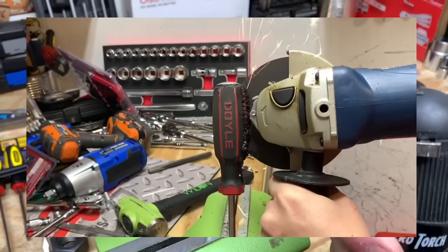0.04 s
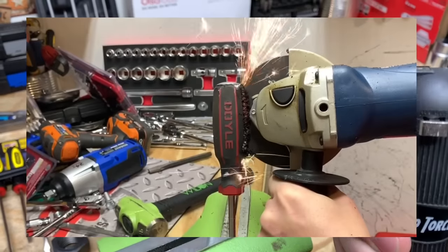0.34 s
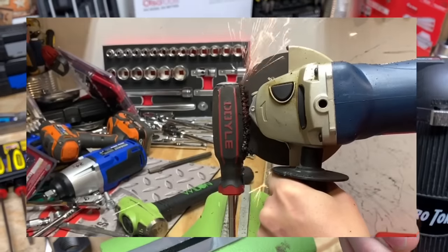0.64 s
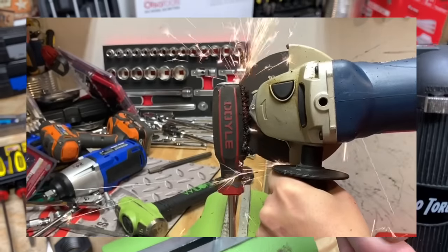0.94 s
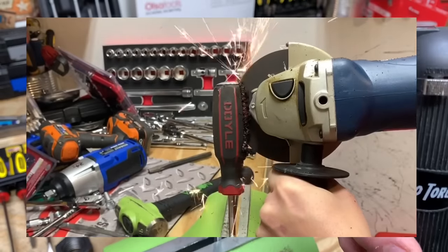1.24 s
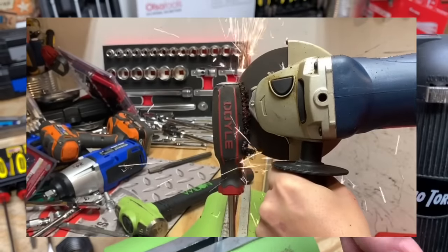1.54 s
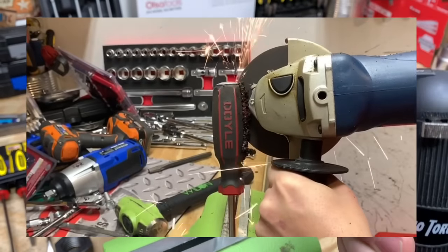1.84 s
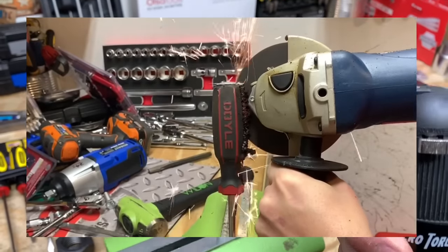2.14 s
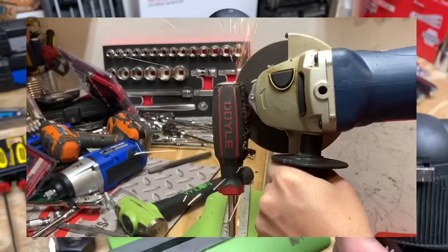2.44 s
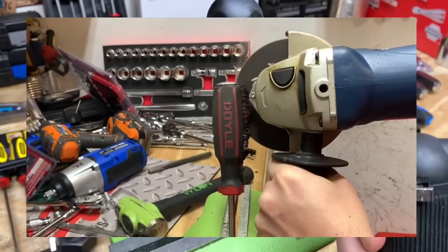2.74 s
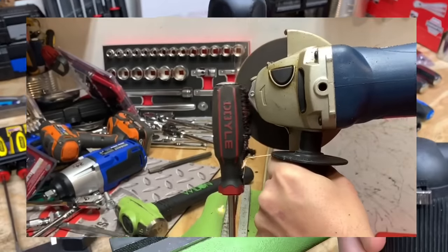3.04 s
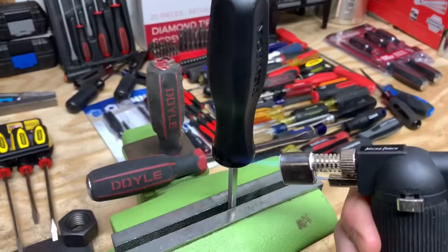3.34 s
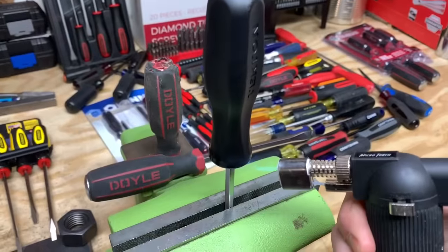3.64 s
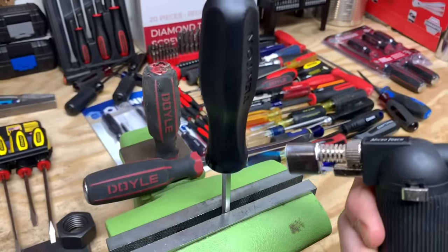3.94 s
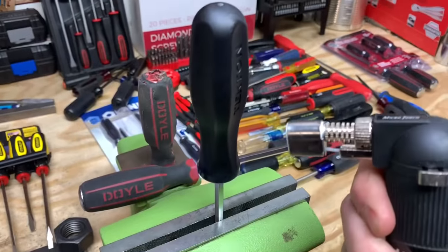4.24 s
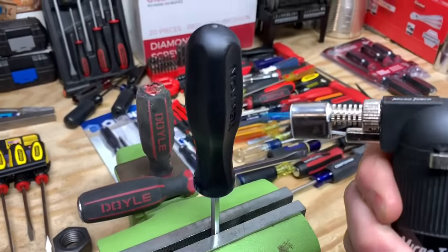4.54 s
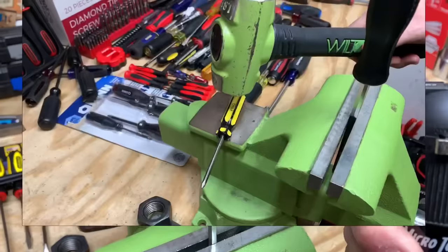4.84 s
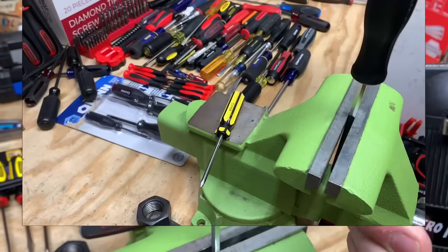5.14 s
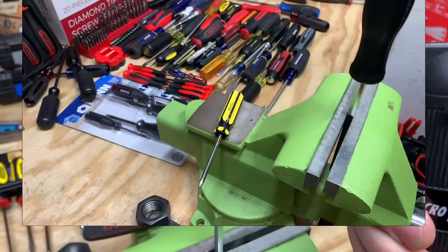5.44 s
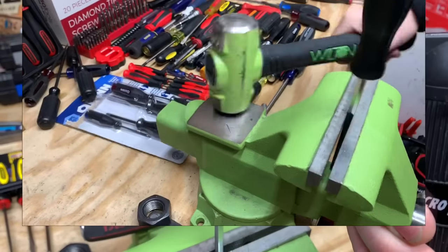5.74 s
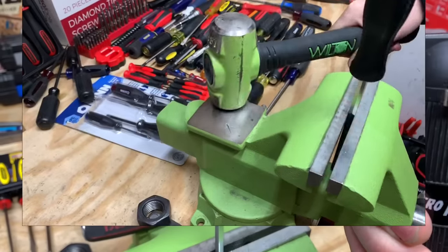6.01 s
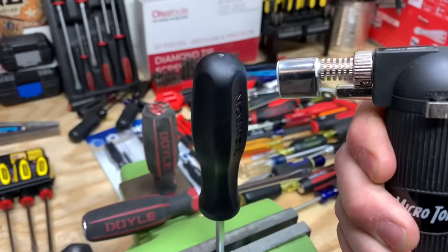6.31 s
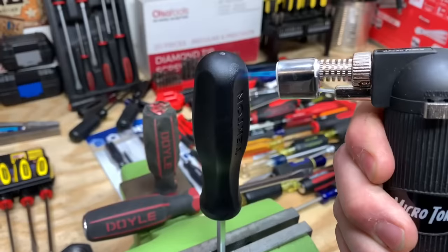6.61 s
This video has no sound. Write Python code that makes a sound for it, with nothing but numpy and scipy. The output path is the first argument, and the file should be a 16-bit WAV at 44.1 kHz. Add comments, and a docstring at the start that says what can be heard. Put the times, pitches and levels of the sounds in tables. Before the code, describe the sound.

An angle grinder bites into a plastic screwdriver handle, rasping and hissing with a wavering gear whine that sinks in pitch as the cut deepens. After about three seconds it fades quickly, leaving the quiet, steady hiss and low rumble of a small gas torch. Near the end a hammer crushes a small screwdriver on a steel vice: a sharp crack, crunching plastic and a brief ringing rattle. The sound is close and dry, at a workbench.

```python
"""Angle grinder, gas torch and hammer.

An angle grinder bites into a plastic screwdriver handle held in a vice and slows as the cut deepens:
its rim rasps, its grit hisses, its gears whine. It fades out over the steady hiss of a small gas torch.
Then a hammer crushes a small screwdriver on the anvil of the vice: a crack, crunching plastic,
and steel that rattles and rings."""
import sys
import numpy as np
from scipy import signal
from scipy.fft import rfft, irfft, next_fast_len
from scipy.io import wavfile
from scipy.ndimage import uniform_filter1d, map_coordinates

SR = 44100
rng = np.random.default_rng(int(sys.argv[2]) if len(sys.argv) > 2 else 0)


def store_pcm(level_fs):
    """Save levels as 16-bit WAV."""
    pcm = np.round(np.clip(level_fs, -1, 1) * 32767).astype(np.int16)
    wavfile.write(sys.argv[1], SR, np.atleast_2d(pcm).T)


N = 294147
T = np.arange(N) / SR
BINS_HZ = np.fft.rfftfreq(N, 1 / SR)


def amp(db):
    """Decibels to gain."""
    return 10 ** (np.asarray(db) / 20)


def unit(x):
    """Scales to rms 1."""
    return x / np.sqrt(np.mean(abs(x) ** 2) + 1e-20)


def levelled(x):
    """Holds the running rms at 1."""
    return x / np.sqrt(abs(uniform_filter1d(x ** 2, size=5000)) + 1e-12)


def curve(rows):
    """Rows of (seconds, value) interpolated over T."""
    return np.interp(T, *np.transpose(rows))


def spectrum(rows):
    """Rows of (Hz, value) interpolated over BINS_HZ on a log axis."""
    hz, value = np.transpose(rows)
    return np.interp(np.log(BINS_HZ + 1), np.log(hz + 1), value)


def shaped(x, gain):
    """Filters x by a gain given at BINS_HZ."""
    size = next_fast_len(N)
    return irfft(rfft(x, size) * np.interp(np.fft.rfftfreq(size, 1 / SR), BINS_HZ, gain), size)[:N]


def noise(gain):
    """Filtered noise of rms 1."""
    return unit(shaped(rng.standard_normal(N), gain))


def peak(hz, width_hz):
    """Gain of a steep-sided resonance."""
    return 1 / (1 + 0.4 * ((BINS_HZ ** 2 - hz ** 2) / (width_hz * (BINS_HZ + 1))) ** 2)


def drift(per_s):
    """Random wander of rms 1."""
    knots = rng.standard_normal(4000)
    return unit(np.interp(T * per_s, np.arange(len(knots)), knots))


def bump(peak_s, length_s):
    """Smooth rise and fall."""
    return np.cos(np.pi * np.clip((T - peak_s) / length_s, -.5, .5)) ** 2


def swell(t, rise_s, t60_s, hold_until_s=0):
    """Linear rise, optional hold, exponential decay."""
    return np.clip(t / rise_s, 0, 1) * amp(-60 * np.maximum(t - max(rise_s, hold_until_s), 0) / t60_s)


def delayed(x, delay_s):
    """Time-varying delay."""
    return map_coordinates(x, [(T - delay_s) * SR], order=3)


def add(mix, start_s, sound):
    """Mixes a sound in at start_s."""
    part = mix[round(start_s * SR):][:len(sound)]
    part += sound[:len(part)]


# Flame spectrum. Each row: frequency in Hz, relative level in dB.
FLAME_SPECTRUM = [(15, -25), (25, -6), (50, -9), (82, -14), (161, -6.5), (216, -8.5), (280, -18.5),
                  (650, -19), (1200, -21.5), (1950, -31), (3200, -26), (4500, -17), (5500, -26.5),
                  (7500, -33.5), (11200, -32.5), (12200, -40), (15800, -33)]
# Flame and nozzle resonances. Each row: frequency in Hz, width in Hz, dB aimed low, dB aimed high.
JET_MODES = [(47.4, 16, -62, -57), (4533, 330, -54.3, -52.5), (5700, 1200, -65.5, -64),
             (7470, 550, -75, -66), (9860, 500, -79, -72.5), (14700, 830, -70, -74)]
# Echo off the bench. Each row: time in seconds, extra path in metres.
BENCH_PATH = [(3.3, .173), (3.63, .158), (3.8, .168), (4.0, .197), (4.22, .236), (4.45, .262), (4.75, .283),
              (5.5, .313)]


def torch(flame_db=-53, sputter_db=-69, tilt_start_s=3.75, tilt_length_s=0.35, beam_hz=14000):
    """The flame rumbles and the nozzle hisses; raised, the torch sputters and its bench echo sweeps."""
    aim = np.clip((T - tilt_start_s) / tilt_length_s, 0, 1)
    gas = amp(flame_db) * noise(amp(spectrum(FLAME_SPECTRUM)))
    for hz, width_hz, low_db, high_db in JET_MODES:
        gas += amp(low_db + aim * (high_db - low_db)) * noise(peak(hz, width_hz))
    gas *= amp(.5 * drift(25))  # flutter
    gas += aim * amp(sputter_db + 5 * np.minimum(drift(70), 2)) * noise(peak(1520, 1040))
    path_m = curve(BENCH_PATH)
    treble_beam = BINS_HZ / np.hypot(BINS_HZ, beam_hz)
    echo = shaped(delayed(gas, path_m / 343), treble_beam)  # sound travels 343 m/s
    return gas + .55 * (.18 / path_m) ** .6 * echo


def burst(db, hz, octaves, t60_s, rise_s, size=8192):
    """A short burst of noise in one band."""
    t, f = T[:size], np.fft.rfftfreq(size, 1 / SR) + 1
    band = np.exp(-.5 * (np.log2(f / hz) / octaves) ** 2) / np.sqrt(1 + f / hz)
    envelope = amp(db - 60 * t / t60_s) * (1 - np.exp(-t / rise_s))
    sound = envelope * irfft(band * np.exp(2j * np.pi * rng.random(len(f))))
    return sound * np.linalg.norm(envelope) / np.linalg.norm(sound)


# The handle gives way. Each row: start in seconds, snap in dB, snap in Hz, knock in dB, knock in Hz.
FRACTURES = [(5.6254, -30, 9000, -26, 1460), (5.63, -20.5, 3460, -29.5, 500),
             (5.68, -26.5, 7000, -21, 2040), (5.793, -33, 8500, -46, 700), (5.825, -41, 4500, -25.5, 360),
             (5.859, -26.5, 8000, -26, 603), (5.9258, -30.5, 6000, -39, 700),
             (5.994, -26.5, 5640, -44, 1500), (6.044, -22.5, 2020, -26.5, 597),
             (6.108, -35, 4000, -28, 740), (6.1197, -24.5, 8300, -49, 900), (6.18, -27, 2960, -30, 1400),
             (6.27, -30, 6240, -60, 1000)]


def hammer_cracks(strike_s=5.6242):
    """The hammer lands with a tick; each fracture is a bright snap and a duller knock on the anvil."""
    out = np.zeros(N)
    add(out, strike_s, burst(db=-12.5, hz=9900, octaves=.5, t60_s=.007, rise_s=0.00014))
    for start_s, snap_db, snap_hz, knock_db, knock_hz in FRACTURES:
        add(out, start_s, burst(snap_db, snap_hz, octaves=0.67, t60_s=0.043, rise_s=0.0008))
        ring_s = 0.078 * (1000 / knock_hz) ** 0.39  # lower knocks ring longer
        add(out, start_s, burst(knock_db, knock_hz, octaves=0.7, t60_s=ring_s, rise_s=0.0019))
    return out


# Spectra of crushing and of sliding on steel. Each row: frequency in Hz, relative level in dB.
CRUNCH_SPECTRUM = [(30, -25), (60, 6), (200, 0.5), (300, 4.5), (420, 0), (680, 3.5), (1050, -5.5),
                   (1600, 0), (3000, -7), (6500, -17.5), (9000, -19), (15500, -42)]
SLIDE_SPECTRUM = [(100, -19), (300, -19), (700, 6.5), (1500, -2), (3500, 4.5), (6000, -8), (8000, -12),
                  (11000, -24), (15500, -15)]
# The hammer bears down. Each row: start in seconds, length in seconds, level in dB, brightness 0-1.
HAMMER_SQUEEZES = [(5.621, 0.097, -34.5, 0.2), (5.723, 0.12, -33.5, .1), (5.852, 0.053, -41.5, 0),
                   (5.904, 0.075, -45.5, .1), (5.972, 0.068, -41.5, 0.5), (6.051, 0.053, -32, 0.43),
                   (6.14, 0.048, -33.5, .75), (6.206, 0.03, -46, 1)]


def plastic_crunch(grains_per_s=4000, spread_db=0.5, lumpy_db=1.2):
    """Tiny fractures crowd under each squeeze; they brighten when the head slides on steel."""
    sizes = amp(spread_db * np.minimum(rng.exponential(1, N), 4)) * rng.choice([-1, 1], N)
    grains = sizes * (rng.random(N) < grains_per_s / SR) * amp(lumpy_db * drift(170))
    crunch = unit(shaped(grains, amp(spectrum(CRUNCH_SPECTRUM))))
    slide = unit(shaped(grains, amp(spectrum(SLIDE_SPECTRUM))))
    out = np.zeros(N)
    for start_s, length_s, db, bright in HAMMER_SQUEEZES:
        envelope = amp(db) * swell(T - start_s, rise_s=0.015, t60_s=.16, hold_until_s=length_s)
        out += envelope * ((1 - bright) * crunch + bright * slide)
    return out


# Modes of the steel. Each row: frequency in Hz, relative level in dB, t60 in seconds.
STEEL_MODES = [(2599, 1, .24), (3020, -10, .12), (3582, -8, .2), (4001, -4.5, .27), (4163, -6, .22),
               (4392, -9, .2), (5008, -1, .4), (5620, 0, .22), (6002, -12, .25), (7160, -9, .15),
               (7293, -8, .25), (7452, -7, .35), (7928, -2, .16), (8900, -13, .15), (9146, -11, .19),
               (9680, -11, .2), (9815, -13, .2), (10470, -16, .2), (11200, -16, .15), (13300, -17, .2),
               (14290, -19, .2)]
# Bouts of rattling. Each row: start in seconds, level in dB, rise in seconds, tilt in dB per octave.
RATTLE_BOUTS = [(5.995, -33, 0.034, 2), (6.065, -33.3, 0.021, -2), (6.121, -33.5, .0045, 5.5)]
# Thin pings. Each row: start in seconds, level in dB, frequency in Hz, rise and t60 in seconds.
SHAFT_PINGS = [(5.68, -37, 14280, .06, .2), (5.68, -40.5, 13160, .07, .35), (5.735, -35, 9674, .05, .55),
               (6.185, -39.5, 11690, .03, .13)]


def steel_rattle(start_s=5.6, pivot_hz=5500, shimmer_db=3.0, jolt_rad=0.2, jolts_per_s=120):
    """Rattling steel rings in its modes, jolted in level and phase; the loosened shaft pings."""
    out, t = np.zeros(N), T[T > start_s]
    partials = []
    for hz, mode_db, t60_s in STEEL_MODES:
        bouts = sum(amp(db + tilt * np.log2(hz / pivot_hz)) * swell(t - at_s, rise_s, t60_s)
                    for at_s, db, rise_s, tilt in RATTLE_BOUTS)
        partials.append((hz, amp(mode_db) * bouts))
    for at_s, db, hz, rise_s, t60_s in SHAFT_PINGS:
        partials.append((hz, amp(db) * swell(t - at_s, rise_s, t60_s)))
    for hz, envelope in partials:
        shimmer, jolt = (np.interp((t - start_s) * jolts_per_s, np.arange(200), knots)
                         for knots in rng.standard_normal((2, 200)))
        phase = 2 * np.pi * (hz * t + rng.random()) + jolt_rad * jolt
        out[-len(t):] += envelope * amp(shimmer_db * shimmer) * np.sin(phase)
    return out


def workshop(x, wet_db=-13, t60_s=0.099, size=12000):
    """Adds a short tail from the cluttered bench and walls."""
    t = T[:size]
    tail = rng.standard_normal(size) * (rng.random(size) < .05) * (t > .003) * amp(-60 * t / t60_s)
    return x + amp(wet_db) * signal.fftconvolve(x, tail / np.linalg.norm(tail))[:N]


# Rim friction. Each row: frequency in Hz, share 0-1 that repeats with each turn.
REPEAT_SHARE = [(200, 0.96), (700, 0.76), (1500, 0.66), (3000, 0.65), (6000, 0.5), (10000, 0.33)]


def rim_friction(turns, wears, size=4096, harmonics=130):
    """Rim bumps pass once a turn, over noise; some come and go with wear. One signal per wear value."""
    place = (turns * size).astype(int) % size
    phases = 2 * np.pi * rng.random((4, harmonics))
    lasting, *passing = [unit(irfft(np.r_[0, 0, np.exp(1j * p)], size))[place] for p in phases]
    worn = sum(bumps * drift(4.047) for bumps in passing)
    share = np.clip(spectrum(REPEAT_SHARE), 0, 1)
    loose = shaped(rng.standard_normal(N), np.sqrt(1 - share))
    return [shaped(0.61 * unit(lasting + wear * worn), np.sqrt(share)) + loose for wear in wears]


def tool_echoes(x, gain=0.17, sway_s=.00003, count=5):
    """Echoes off nearby tools comb the treble and shift as the hands sway."""
    delays_s = rng.uniform(0.000803, .006, count)
    return x + gain * sum(delayed(x, delay_s + sway_s * drift(1.477)) for delay_s in delays_s)


# Grit spectrum. Each row: frequency in Hz, relative level in dB.
GRIT_SPECTRUM = [(2120, -19), (3600, -2.5), (3930, -5.5), (4550, -0.5), (5060, -2.5), (5910, -1.5),
                 (6440, -5), (8200, 0), (9340, -5), (10200, -1.5), (12000, -5.5), (14800, -5.5),
                 (15800, -6.5)]


def grit_hiss(grit, depth, sag_hz, spark_db, base_db=-31.5, fizz_hz=11000):
    """Grit hisses louder under load; the top of the hiss swells more when sparks fly."""
    level_db = base_db - 3 * depth ** 2 + 0.1976 * np.maximum(sag_hz, 0) + spark_db
    hiss = amp(level_db) * levelled(shaped(grit, amp(spectrum(GRIT_SPECTRUM))))
    fizz = shaped(hiss, 1 / (1 + (fizz_hz / (BINS_HZ + 1)) ** 6))
    return hiss + (amp(-0.5 + spark_db + 0.5 * depth) - 1) * fizz


# Screeches. Each row: peak time and length in seconds, frequency and width in Hz, level in dB.
EDGE_CATCHES = [(1.041, 0.99, 14700, 400, -49), (1.3, 0.37, 6030, 220, -46), (1.736, 0.69, 5690, 220, -49),
                (1.847, 0.76, 7900, 500, -47), (3.047, 0.86, 6520, 220, -58)]


def screeches(grit):
    """Narrow resonances swell and fade where the grit catches an edge."""
    return sum(amp(db) * bump(peak_s, length_s) * unit(shaped(grit, peak(hz, width_hz)))
               for peak_s, length_s, hz, width_hz, db in EDGE_CATCHES)


def gear_whine(angle, depth, racing_hz, strain_db, teeth=38, base_db=-29, overtone_db=-19):
    """The bevel gear's teeth mesh in a wavering tone with its octave."""
    level_db = base_db - 14.5 * depth ** 2 - 0.61 * racing_hz + strain_db + 2.3 * drift(34.93)
    return amp(level_db) * (np.sin(teeth * angle) + amp(overtone_db) * np.sin(2 * teeth * angle))


# Snarl partials. One entry each: multiple of the disc speed, dB in a shallow cut, dB in a deep cut.
SNARL_MULTIPLES = [6, 9, 10, 15, 17, 18, 22, 24, 25, 26, 29, 33, 34, 41]
SNARL_SHALLOW_DB = [-49, -56.5, -53.5, -44.5, -41.5, -45.5, -43, -40, -49, -38, -44, -40, -43, -45]
SNARL_DEEP_DB = [-52, -37.5, -40.5, -57, -110, -68, -68, -55, -45, -53, -53, -54, -41, -66]


def snarl(angle, depth, speed_hz, racing_hz, moan_db, moan_hz=670, moan_width_hz=90):
    """Uneven gears and a slightly warped disc sound multiples of the turning speed."""
    binding = depth ** 2  # the disc binds only once it is well in
    out = np.zeros(N)
    for multiple, shallow_db, deep_db in zip(SNARL_MULTIPLES, SNARL_SHALLOW_DB, SNARL_DEEP_DB):
        near_moan = 1 / (1 + ((multiple * speed_hz - moan_hz) / moan_width_hz) ** 2)
        db = shallow_db + binding * (deep_db - shallow_db) + .7 * near_moan * moan_db + 3 * drift(20)
        out += amp(db) * np.sin(multiple * angle + 2 * np.pi * rng.random() + drift(4.055))
    return amp(-0.35 * racing_hz) * out  # racing freely, the gears hardly press


def body(drive, modes, depth):
    """Resonances whose strengths shift as the disc sinks in."""
    shallow = np.sqrt(sum((amp(db) * peak(hz, width)) ** 2 for hz, width, db, _ in modes))
    deep = np.sqrt(sum((amp(db) * peak(hz, width)) ** 2 for hz, width, _, db in modes))
    return levelled((1 - depth) * unit(shaped(drive, shallow)) + depth * unit(shaped(drive, deep)))


# Disc speed, sagging under load. Each row: time in seconds, turns per second.
DISC_SPEED = [(0.0, 92.2), (0.09, 98.5), (0.16, 98.3), (0.28, 85.7), (0.45, 81.2), (0.61, 85.7),
              (0.7, 82.6), (0.92, 84.2), (1.38, 78.7), (1.61, 72.5), (1.91, 73.4), (2.07, 71.4),
              (2.17, 72.8), (2.26, 70.8), (2.68, 69.4), (2.8, 72.3), (2.96, 71.8), (3.1, 67.1),
              (3.25, 66.8)]
# The cut. Each row: time in seconds, depth 0-1.
CUT_DEPTH = [(0, 0.1), (.22, 0.36), (.36, 0.01), (1.3, 0.24), (1.7, 0.54), (2.0, 0.52), (2.3, 0.72),
             (2.5, 1), (3.25, 0.89)]
# The hand presses in. Each row: peak time and length in seconds, change in dB of moan, whine and hiss.
HAND_PRESSES = [(.19, 0.27, 5.5, 1, 1), (0.44, 0.16, -1, 5.5, -1.2), (0.626, 0.24, 0.5, -1.5, 0),
                (1.08, 0.96, -0.5, 1.9, 1.56), (1.364, .32, 0, 5, .5), (1.709, 0.89, -5.5, 4.5, 0.55),
                (2.175, 0.47, 3.5, 4, 1), (2.5, 0.38, 6.5, 0, 1), (2.937, 0.5, 5.5, -18, 0.3)]
# Resonances of handle, guard and disc. Each row: frequency and width in Hz, dB cut shallow, dB cut deep.
HANDLE_MODES = [(259, 30, -16.5, -13.5), (335, 35, -10.5, -12.5), (487, 42, 2.5, -6.5),
                (622, 47, -12, -2.5), (670, 90, -8.5, 0.5), (860, 100, -8, -4.5), (995, 120, -10, -8)]
GUARD_MODES = [(1232, 150, -8, -19), (1408, 41, 3, -8.5), (1555, 140, -11, -8), (1834, 77, 1.5, -0.5),
               (2017, 120, 3, 0), (2194, 26, 2, 4), (2473, 31, 4.5, -10), (2545, 390, -8.5, -4.5),
               (2715, 55, 6.5, -2), (2925, 96, 6, 2.5), (3087, 61, -1, 1.5), (3310, 260, -4.5, -6.5)]


def grinder(loaded_hz=83.4, inertia_s=0.031, end_s=3.25, fade_s=0.057,
            rasp_db=-31.5, drone_db=-44, hum_db=-52, shudder_db=-55):
    """The spinning rim scrapes the plastic: the guard rasps, the handle drones, grit and gears join."""
    depth = curve(CUT_DEPTH)
    speed_hz = uniform_filter1d(curve(DISC_SPEED), size=int(inertia_s * SR), mode="nearest")
    sag_hz = loaded_hz - speed_hz
    racing_hz = np.maximum(-sag_hz, 0)
    moan_db, strain_db, spark_db = sum(np.outer(changes_db, bump(peak_s, length_s))
                                       for peak_s, length_s, *changes_db in HAND_PRESSES)
    snag = (0.00099 + 0.00404 * depth) * drift(70)  # a deep cut smears the upper harmonics
    turns = np.cumsum(speed_hz * (1 + snag)) / SR
    angle = 2 * np.pi * turns
    scrape, push = rim_friction(turns, wears=(0.81, 0.38))
    scrape *= amp(0.6 * np.cos(angle) + 0.3 * (.5 + depth) * drift(160))  # contact throbs and grabs
    rasp = amp(rasp_db + 4 * depth + 0.16 * moan_db) * body(scrape, GUARD_MODES, depth)
    drone = amp(drone_db + 3.5 * depth ** 2 + moan_db) * body(push, HANDLE_MODES, depth)
    grit = tool_echoes(scrape * amp(drift(550)))
    hiss = grit_hiss(grit, depth, sag_hz, spark_db) + screeches(grit)
    gears = gear_whine(angle, depth, racing_hz, strain_db)
    gears += snarl(angle, depth, speed_hz, racing_hz, moan_db)
    hum = np.sqrt(2) * amp(hum_db - 25 * depth ** 2 - 0.22 * sag_hz) * np.sin(angle)
    shudder = amp(shudder_db) * depth * unit(shaped(push, peak(115, 140)))
    fade = np.clip((end_s - T) / fade_s, 0, 1)
    return (rasp + drone + hiss + gears + hum + shudder) * fade


def scene():
    """Grinder, torch and hammer, in mono."""
    return (grinder() + torch() + workshop(hammer_cracks() + plastic_crunch()) + steel_rattle())[None]


def record(dry):
    """Steep low-pass at 15850 Hz."""
    lowpass = signal.firwin(701, 15850, window=("kaiser", 8), fs=SR)
    return signal.oaconvolve(dry, lowpass[None], "same")


dry = scene()
out = record(dry)
store_pcm(out)
```